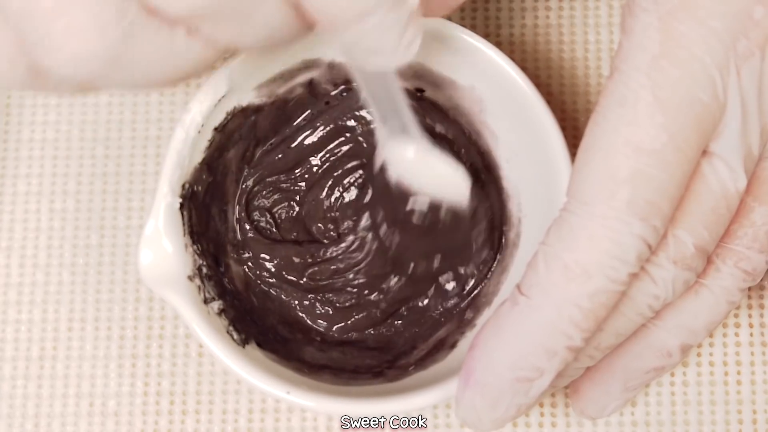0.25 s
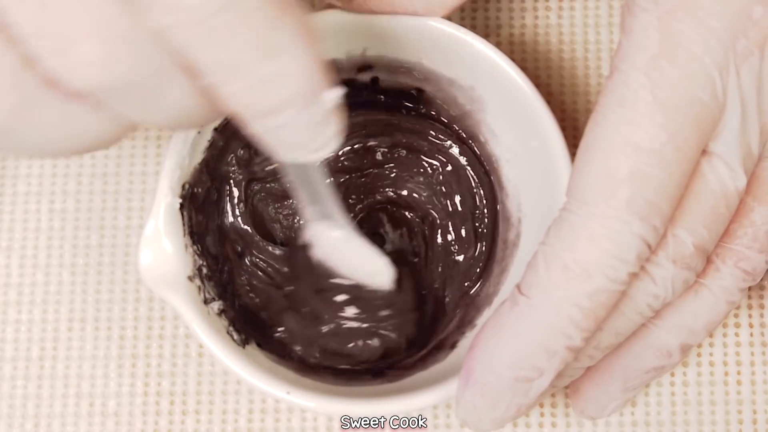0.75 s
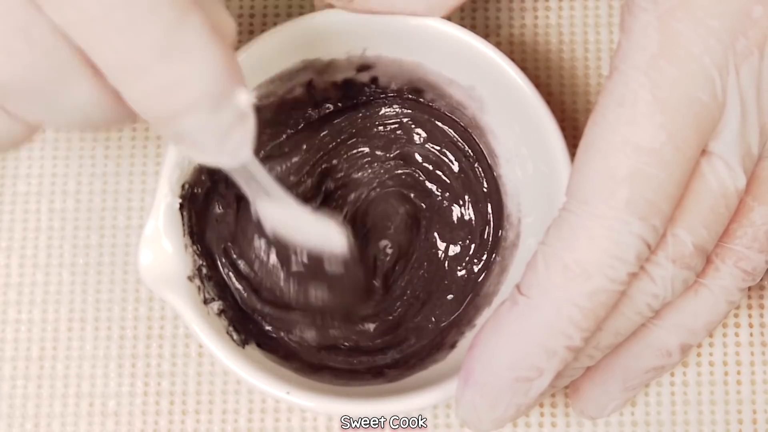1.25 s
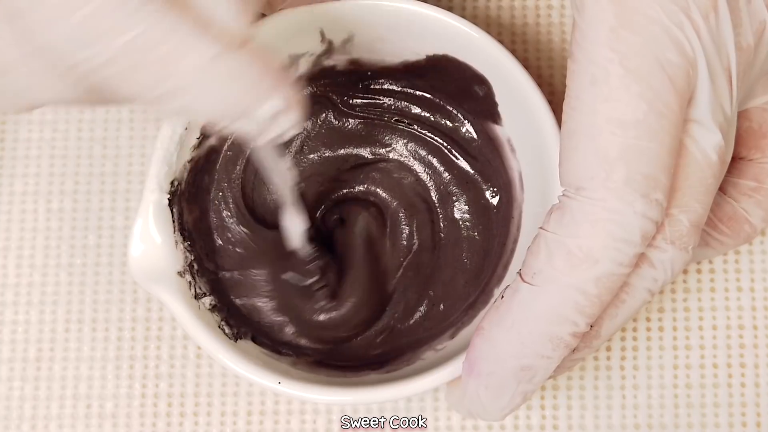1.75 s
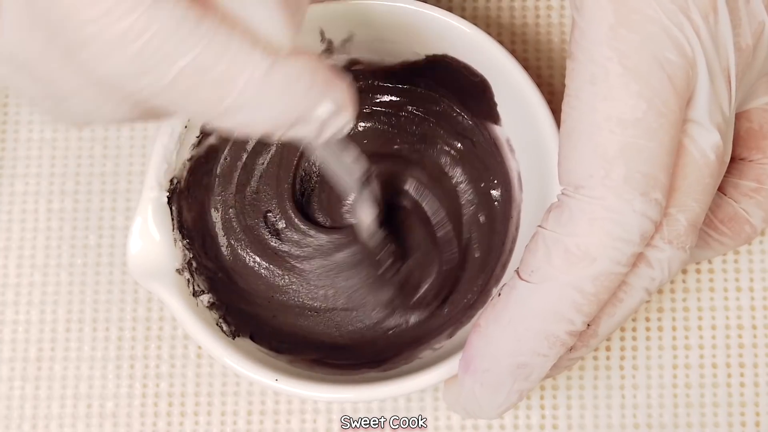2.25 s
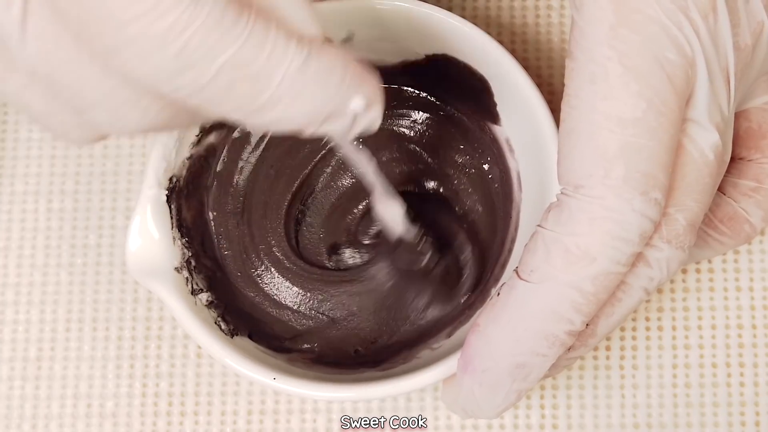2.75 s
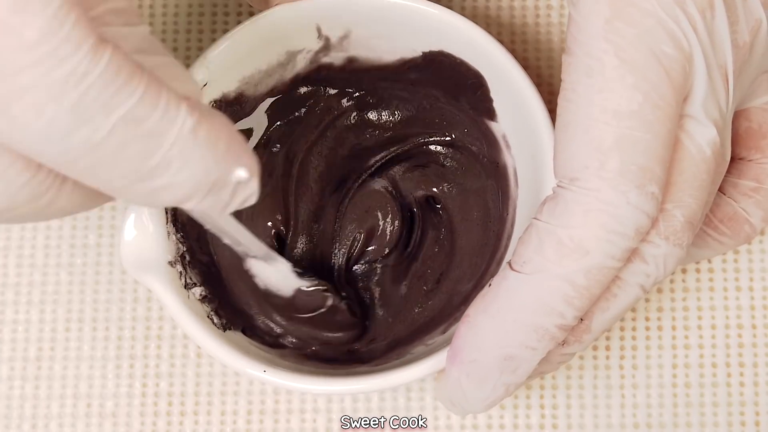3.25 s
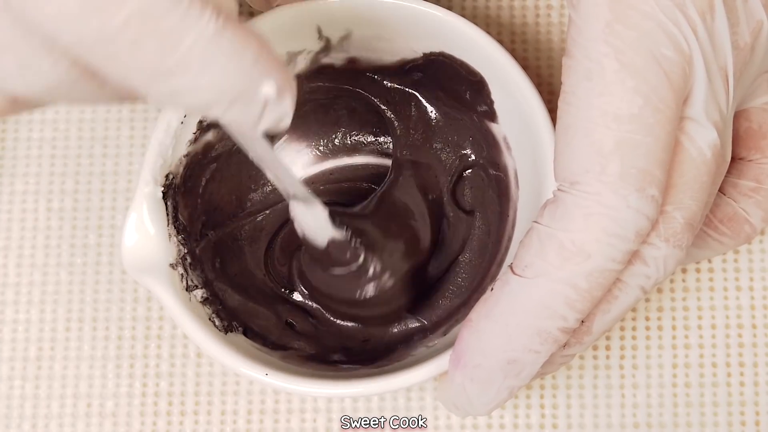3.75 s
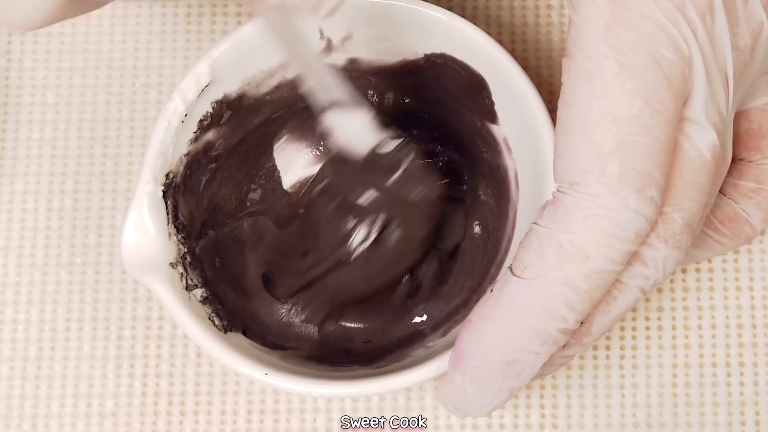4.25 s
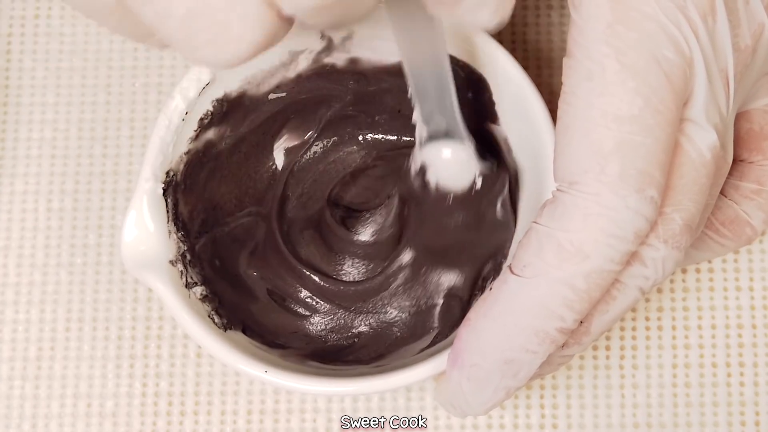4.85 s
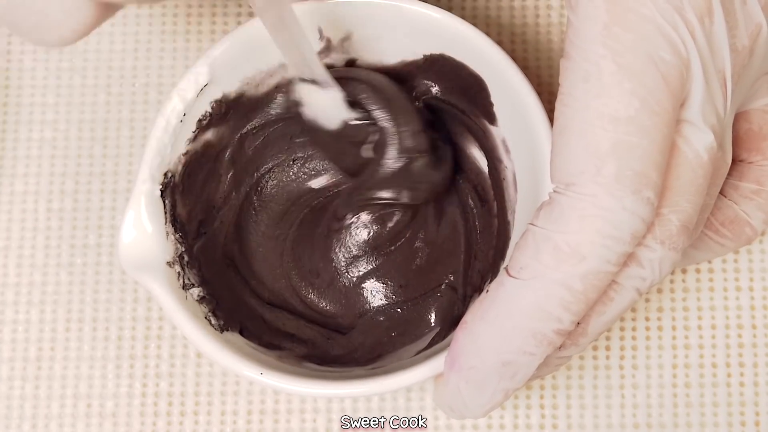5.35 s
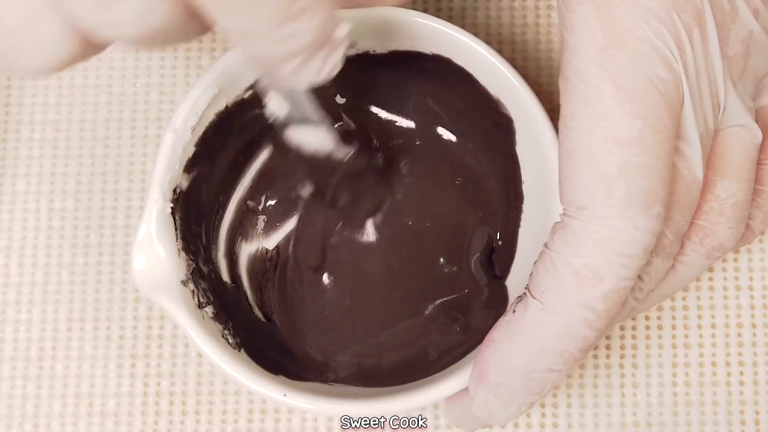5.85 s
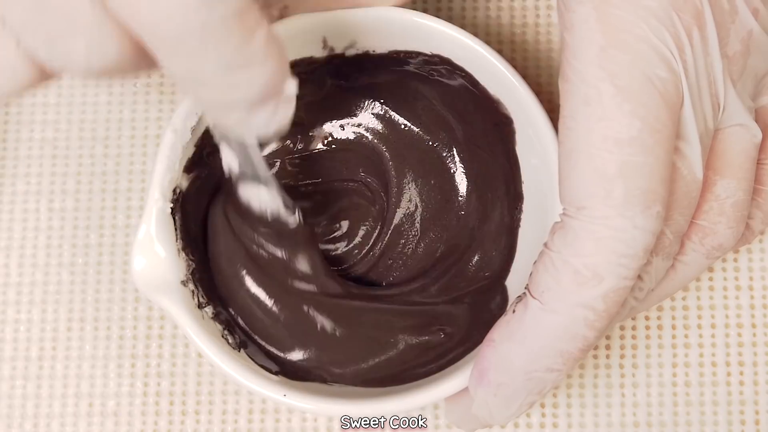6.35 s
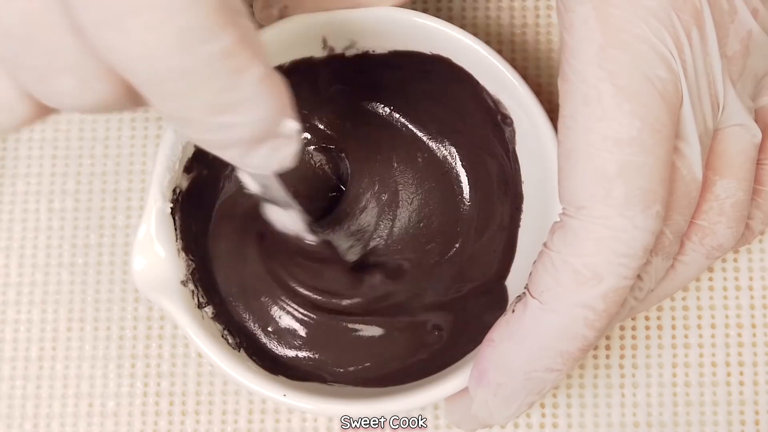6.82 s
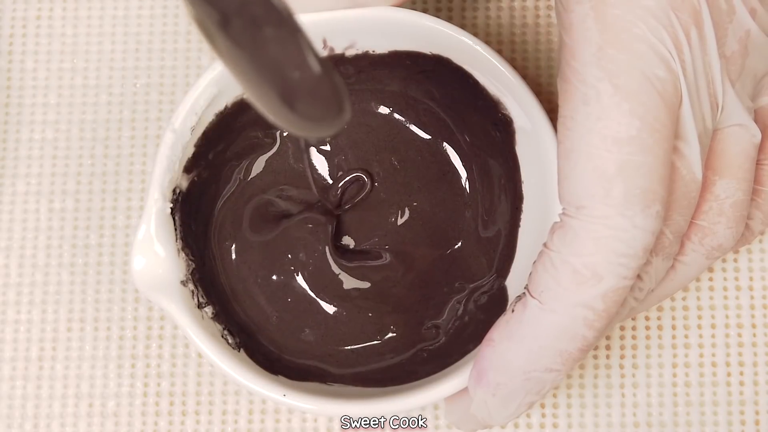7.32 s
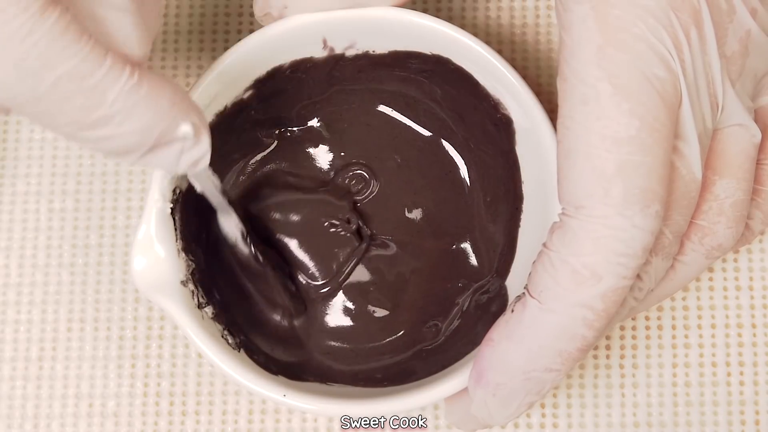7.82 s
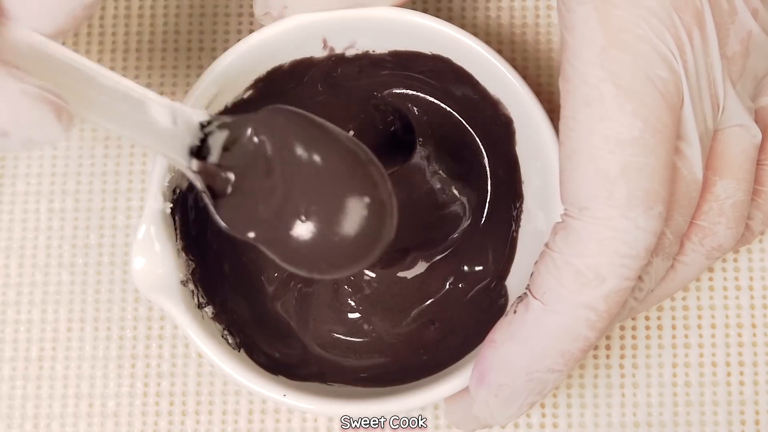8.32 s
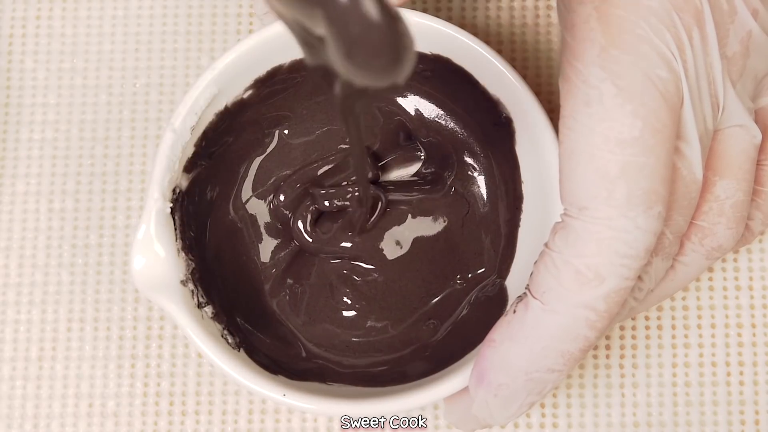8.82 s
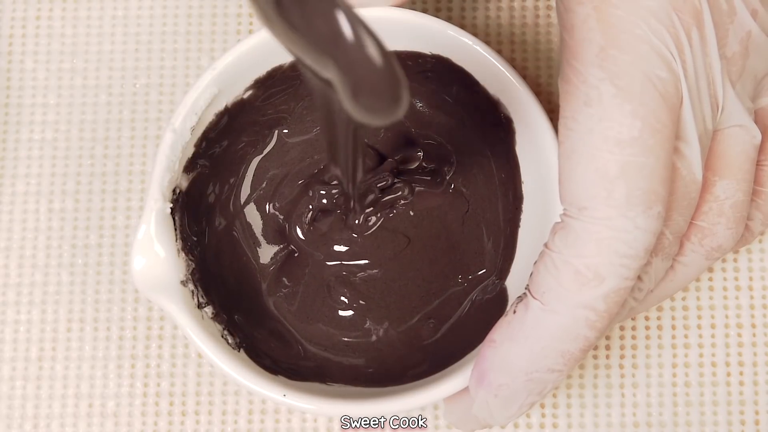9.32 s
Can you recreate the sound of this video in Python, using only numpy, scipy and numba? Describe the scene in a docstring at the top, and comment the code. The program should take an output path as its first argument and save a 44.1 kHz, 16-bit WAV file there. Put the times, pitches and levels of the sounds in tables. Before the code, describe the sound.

Sticky paste peels off a plastic blade and a small bowl in wet squelches, sucking noises and fine crackle. Air pockets pop open with short hollow plops and bright snaps, the strongest around the middle. Strokes grow longer and gooier, then stop, leaving faint room air and one brief late stir. Close stereo microphone, little room tail, low thuds shaking the table.

```python
"""In a quiet kitchen, a small plastic spatula stirs thick icing in a ceramic bowl close to a stereo microphone.
Turns open air pockets with a plop: a short swinging tone, a bright crackling part and a thump on the table.
The paste peels apart in streams of tiny damped tones, shaped by hollows and slits; later strokes are long and sticky.
The work shakes the table and the microphone stand: low ringing noise under soft handling and room noise."""
import sys
import numpy as np
from scipy import signal
from scipy.fft import rfft, irfft, next_fast_len
from scipy.io import wavfile
from scipy.ndimage import map_coordinates
from numba import njit

SR = 44100
rng = np.random.default_rng(int(sys.argv[2]) if len(sys.argv) > 2 else 0)


def generate_wav(sig):
    """Save sig (samples, or channels by samples) to the path in sys.argv[1] as 16-bit PCM at SR."""
    pcm = np.round(np.clip(np.atleast_2d(sig).T, -1, 1) * 32767).astype(np.int16)
    wavfile.write(sys.argv[1], SR, pcm)


N = 422467  # samples in the whole scene

# How the wet surface slides all along. Each row: time in seconds, relative level in dB.
SLIDE = [(0, -67.5), (1.5, -63), (2.5, -67), (3.9, -67.5), (4.8, -68.5), (5.9, -68.5), (7, -62.5),
         (7.3, -89), (8.3, -74.5), (9.55, -90)]
# Air resonances of a pocket. Each row: pitch in Hz and width in Hz (of one filter pass, both before
# the pitch ratio), level in dB.
POCKET = [(634, 317, 3), (852, 305, -2.5), (1930, 540, -11.5)]
# The same columns for the slit behind the blade.
SLIT = [(1997, 1040, -0.47), (3500, 890, 0.98), (7400, 2250, -2.5)]
# Tone colour of tearing films. Each row: frequency in Hz, relative level in dB.
TEAR = [(500, 5.5), (1000, -11), (1500, -19), (2700, 2.5), (4000, 0), (5200, -0.5), (7000, 1.5), (8800, -4),
        (12000, -5.5), (16000, -16)]


def peeling():
    """Paste parts from blade and bowl in quick fits: pockets squelch, air sucks through slits, films tear."""
    hollow, sucking, tearing, pocket_pitch, slit_pitch, fitful = stroke_gains()
    slide = amp(curve(SLIDE) + 3 * wobble(9))
    fits = unit(amp(fitful * (2.35 * wobble(70) + 2.83 * wobble(330))))

    pockets = grains(rate=3500, low_hz=324, high_hz=2550, cycles=1.0, spread_db=3.5, scatter_db=-5, size=300)
    squelch_gain = amp(-6.0) * hollow + amp(-13) * slide
    squelch = squelch_gain * cavity(pockets, POCKET, drift=0.05, pitch=pocket_pitch)

    bubbles = grains(rate=7000, low_hz=1270, high_hz=10100, cycles=0.74, spread_db=4.0, scatter_db=-2, size=128)
    suction_gain = amp(-2.5) * sucking + amp(-15.0) * slide
    suction = suction_gain * cavity(bubbles, SLIT, drift=0.06, pitch=slit_pitch)

    films = grains(rate=3300, low_hz=780, high_hz=16600, cycles=0.71, spread_db=1.0, scatter_db=13.5, size=128)
    tear = (amp(-0.5) * tearing + amp(-14) * slide) * unit(coloured(films, TEAR))

    # the finest films grow slightly faster than the tearing itself
    finest = grains(rate=1500, low_hz=8500, high_hz=15400, cycles=1.0, spread_db=2, scatter_db=14, size=32)
    fizz = amp(-3) * tearing * (tearing / amp(-42)) ** 0.17 * finest

    bright = (suction + tear + fizz) * amp([[1.3], [-1.3]])  # a little louder on the left
    return fits * (bright + squelch * amp([[0.4], [-0.4]]))


# Quick pulls, where the paste lets go at once. Each row: start in seconds, length in seconds,
# then relative levels in dB of pocket squelch, slit suction and tearing, and last the closing smack in dB
# compared with the start of the pull.
PULLS = [(0.112, 0.029, -55.5, -57.5, -74, -5), (0.527, 0.072, -56, -62, -84, -8),
         (0.758, .05, -54, -53, -80, -36), (1.371, 0.064, -52.5, -65, -77, -8.5),
         (1.513, 0.016, -52, -61, -64, -3.5), (1.742, 0.035, -47, -56, -63, -25),
         (1.953, 0.091, -47, -56.5, -58, -24), (2.194, .09, -46.5, -56, -63.5, -3),
         (2.446, 0.061, -45.5, -57, -67, -7.5), (2.706, 0.045, -47, -57, -63, -4.5),
         (2.959, 0.05, -46, -51.5, -61, -24), (3.189, 0.031, -52, -50.5, -61, -0.5),
         (3.556, 0.032, -55, -74, -59.5, -24), (3.776, 0.048, -56, -69, -62, -5),
         (4.09, 0.056, -49, -56.5, -75, -27), (4.313, 0.056, -62, -63.5, -75, 0),
         (4.509, 0.073, -49, -55.5, -84, -17), (4.706, 0.065, -50.5, -53.5, -61, -6.5),
         (4.998, 0.026, -65, -60.5, -67, -4), (5.394, 0.0093, -50, -67, -64, -17),
         (5.746, 0.043, -58, -51, -53, -1), (6.138, 0.042, -58, -52, -57, -11),
         (8, 0.065, -51, -73, -60, -5)]
# Pitch ratios in a quick pull: first the pocket, then the slit.
PULL_PITCH = (1.24, 0.895)
# Slow drags that swell and fade. Each row: start, rise and fall in seconds, relative levels in dB of
# squelch, suction and tearing, then the pitch ratios of pocket and slit.
DRAGS = [(0.01, 0.073, 0.0061, -54, -59, -59.5, 1.33, 0.8),
         (0.219, 0.017, 0.019, -43.5, -62, -69, 1.05, 0.82),
         (0.27, 0.022, .055, -59.5, -68.5, -81, 1.14, 0.97),
         (0.885, 0.023, 0.022, -52.5, -74, -76, 1.04, 0.96),
         (0.995, 0.056, 0.019, -50, -62.5, -77, 1.21, 0.88), (1.155, .04, 0.049, -60, -70, -69, 1.13, 0.95),
         (2.755, .01, 0.038, -60, -66, -65, 1.17, 0.87), (3.225, 0.009, 0.022, -49, -54, -58, 1.34, 1.01),
         (3.61, 0.13, .01, -50, -75, -61, 0.97, 1.14), (3.723, 0.025, 0.018, -38, -49, -54, 1, 1.41),
         (5.034, .036, 0.084, -60, -48.5, -55, 1.03, 1.026),
         (5.41, 0.13, 0.022, -49, -54.5, -55.5, 1.11, 1.05),
         (5.804, 0.027, 0.059, -47, -44, -47, 1.17, 1.01), (6.17, 0.047, 0.036, -48, -59, -62, 0.88, 0.87),
         (6.259, 0.051, .08, -47, -50.5, -51.5, 1.2, 1.08),
         (6.439, 0.062, 0.035, -49.5, -59, -63.5, 1.19, 0.94),
         (6.538, 0.014, 0.07, -53, -57.5, -58.5, 0.98, 1.04),
         (6.59, 0.016, 0.032, -53, -73, -56, 1.7, 0.83), (6.629, 0.015, 0.061, -55.5, -58, -59, 1.17, 1.05),
         (6.705, 0.016, 0.063, -49, -57, -60, 1.23, 0.67), (6.84, 0.072, 0.034, -56, -59, -59, 1.14, 1.04),
         (6.96, 0.022, 0.038, -50.5, -61.5, -63, 1.15, 0.72),
         (7.819, 0.053, 0.011, -72, -78, -62.5, 1.1, 1.4), (8.015, 0.063, 0.2, -51.5, -66, -61.5, 1, 1.58),
         (8.155, 0.026, 0.033, -45, -54, -58, 0.97, 1.6), (8.234, 0.0092, .012, -57, -65, -73, 1.26, 1.3)]
SAG_DB, SMACK_S = 19, 0.0068  # weakening of a pull over its length; half width of its closing smack
SWELL_DB, FADE_DB = 10, 7  # a drag starts and ends this far below its crest
EDGE_S, RELEASE_S = 0.0041, 0.013  # time to take hold of the paste and to let go
FITFUL_S, FITFUL_MAX = 0.063, 1.57  # shorter strokes stick and slip more, longer ones less; upper limit


def stroke_gains():
    """Each stroke sets squelch, suction and tearing strength, two pitch ratios, and how fitfully paste parts."""
    t = np.arange(SR // 3) / SR - EDGE_S
    strokes = []
    for s, length, *levels, smack_db in PULLS:
        smack = amp(smack_db) * np.exp(-0.5 * ((t - length) / SMACK_S) ** 2)
        shape = gate(t, length) * amp(-SAG_DB * t / length) + smack
        strokes.append((s, length, shape, levels, PULL_PITCH))
    for s, rise, fall, *levels, pocket, slit in DRAGS:
        length = rise + fall
        swell_db = np.interp(t, [0, rise, length], [-SWELL_DB, 0, -FADE_DB])
        strokes.append((s, length, gate(t, length) * amp(swell_db), levels, (pocket, slit)))

    # overlapping strokes add in power; pitch and fitfulness are averaged by strength
    power, weight, blend = np.zeros((3, N)), np.full(N, 1e-4), np.zeros((3, N))
    for s, length, shape, levels, pitches in strokes:
        fitful = min(FITFUL_S / length, FITFUL_MAX)
        add(power, s - EDGE_S, (amp(levels)[:, None] * shape) ** 2)
        add(weight, s - EDGE_S, shape)
        add(blend, s - EDGE_S, np.log([*pitches, fitful])[:, None] * shape)
    return *np.sqrt(power), *np.exp(blend / weight)


def gate(t, length):
    """The blade takes hold just before t = 0 and lets go after length seconds."""
    return np.clip(1 + t / EDGE_S, 0, 1) * np.clip(1 - (t - length) / RELEASE_S, 0, 1)


def cavity(x, modes, drift, pitch=1):
    """Sound through a hollow in the paste; its resonances move together as it changes size; rms 1."""
    ratio = pitch * np.exp(drift * wobble(13))
    out = np.zeros_like(x)
    for hz, width, db in modes:
        step = np.tan(np.pi * np.minimum(hz * ratio, SR / 3) / SR)
        once = glide_filter(x, step, width / hz)
        out += amp(db) * glide_filter(once, step, width / hz)
    return unit(out)


@njit
def glide_filter(x, step, damping):
    """A resonance whose centre moves; step is tan(pi f / SR) for each sample."""
    y = np.zeros_like(x)
    for c in range(2):
        s1 = s2 = 0.0
        for i in range(x.shape[1]):
            g = step[i]
            band = (s1 + g * (x[c, i] - s2)) / (1 + g * (g + damping))
            s1 = 2 * band - s1
            s2 += 2 * g * band
            y[c, i] = band * damping
    return y


# Air pockets opening. Each row: start in seconds, relative level in dB, pitch in Hz, cycles to full swing
# (at least 0.05), bright part (film crack or pocket overtone) in relative dB, its pitch in Hz,
# table thump in relative dB.
PLOPS = [(0.0833, -40.5, 1000, 0.36, -43, 6700, -77), (0.5282, -33, 670, 0.19, -37, 6060, -82),
         (0.7042, -38.5, 850, .35, -39, 3900, -77), (0.7585, -44, 815, 0.73, -38, 2200, -81),
         (0.7705, -38, 860, .2, -42, 2200, -82), (0.997, -46, 800, .35, -56, 2500, -89),
         (1.197, -46, 830, .35, -45, 2200, -85), (1.3705, -42.5, 800, 0.27, -39, 2120, -67),
         (1.524, -38.5, 850, 0.44, -37, 2200, -70), (1.7395, -34.5, 710, .35, -28, 2380, -62),
         (1.9502, -37.5, 705, .33, -31.5, 2830, -60), (2.192, -37, 650, 0.44, -31.5, 2860, -65),
         (2.437, -35.5, 520, 0.13, -35.5, 2670, -61.5), (2.7055, -28, 810, 0.71, -24, 3280, -61),
         (2.959, -29.5, 790, 0.23, -24, 2200, -69), (3.015, -43, 850, .35, -54, 2500, -80),
         (3.1868, -29, 950, 0.18, -20.5, 2130, -63), (4.0888, -19, 594, 0.23, -31.5, 3440, -52.5),
         (4.3121, -24, 586, 0.27, -29, 3000, -55), (4.514, -22, 670, .12, -25.5, 5140, -54.5),
         (5.001, -46.5, 620, .35, -33, 3100, -71), (5.5309, -32, 694, 0.37, -58, 5920, -71),
         (6.135, -36.5, 670, 0.44, -30, 3820, -58.5), (8.0019, -42.5, 660, 0.71, -37.5, 3470, -71)]


def plops():
    """The cavity swings under a bright film crack or overtone, the film rips on, and the bowl thumps the table."""
    out, t = np.zeros((2, N)), np.arange(SR // 6) / SR
    thumps = np.zeros(N)
    for s, db, hz, swell, bright_db, bright_hz, thump_db in PLOPS:
        u = t * hz / max(swell, 0.05)  # reaches 1 at full swing
        add(out, s, amp(db) * np.sin(2 * np.pi * hz * t) * u * np.exp(1 - u))
        add(out, s, amp(bright_db - 5) * snap(bright_hz, cycles=1.6, spray_db=-12.5, spray_life=0.0009))
        # the rim of the hole gives way in a few weaker steps
        for late in np.cumsum(rng.uniform(0.0005, 0.0015, size=3)):
            rip_hz = bright_hz * np.exp(rng.normal(0, 0.087))
            rip = snap(rip_hz, cycles=0.66, spray_db=-19.5, spray_life=0.00034)
            add(out, s + late, amp(bright_db - 7.5) * rip)
        add(thumps, s, amp(thump_db + 15) * np.exp(-t / 0.023) * (1 - np.exp(-t / 0.001)))
    table = noise([(25, -15.5), (55, 6.5), (150, -2), (260, -7), (500, -30), (1500, -51)], side_db=-3.5)
    return out * amp([[0.4], [-0.4]]) + thumps * table


# Larger bubbles, threads and the sharp top of some plops. Each row: start in seconds, relative level in dB,
# pitch in Hz.
SNAPS = [(0.1423, -38.5, 3350), (0.902, -38.5, 7920), (0.9122, -43, 8900), (1.828, -40.5, 11900),
         (1.857, -38.5, 9430), (2.5962, -41.5, 5670), (2.8058, -37.5, 3940), (2.9579, -28.5, 6500),
         (3.186, -30, 5650), (3.2836, -30.5, 10000), (3.5556, -33.5, 7600), (3.728, -12.5, 8100),
         (4.1077, -35.5, 8040), (4.2932, -41, 6270), (4.7115, -27.5, 5400), (5.001, -34.5, 7050),
         (5.0697, -31, 3480), (5.2843, -34, 3420), (5.391, -37, 3350), (5.6583, -33, 7340),
         (5.748, -33, 4930), (5.7894, -21, 7400), (5.8069, -27.5, 3750), (5.866, -41, 7500),
         (6.404, -32.5, 3870), (6.6571, -30, 9710), (6.9708, -33, 8390), (7.8228, -48.5, 2330),
         (7.8714, -35.5, 6900), (8.7522, -41, 6500), (9.009, -41.5, 11300)]


def snaps():
    """Larger bubbles, threads and the sharp top of some plops snap, each with a short ring and spray."""
    out = np.zeros((2, N))
    for s, db, hz in SNAPS:
        add(out, s, amp(db + 3.0) * snap(hz, cycles=0.99, spray_db=-16.5, spray_life=0.0013))
    return out * amp([[1.2], [-1.2]])


def snap(hz, cycles, spray_db, spray_life):
    """A sharp snap: a fast-dying tone at its pitch and a brief spray of noise."""
    t = np.arange(SR // 80) / SR
    ring = np.sin(2 * np.pi * hz * t) * np.exp(-t * hz / cycles) * (1 - np.exp(-2 * t * hz))
    band = signal.butter(2, [2200, 15000], "band", fs=SR, output="sos")
    spray = signal.sosfilt(band, rng.standard_normal((2, len(t))))
    return ring + amp(spray_db) * spray * np.exp(-t / spray_life)


def prickle():
    """Stray pinhead bubbles burst on the stirred surface, louder when it slides more."""
    ticks = grains(rate=22, low_hz=6140, high_hz=14000, cycles=1.0, spread_db=5.5, scatter_db=2, size=64)
    return amp(curve(SLIDE) - 13.0) * ticks


# A thin squeak of the blade. Each row: time in seconds, centre pitch in Hz, relative level in dB.
SQUEAK = [(3.3, 4440, -79), (3.4, 4390, -72), (3.54, 4370, -68), (3.57, 4400, -86)]


def squeak():
    """The blade slides over a bare patch of glaze: a faint whistle of unsteady pitch and level."""
    s, hz, db = np.transpose(SQUEAK)
    t = np.arange(N) / SR
    pitch = np.interp(t, s, hz) + 30 * wobble(200)
    grip = amp(np.interp(t, s, db) - 10 + 2.5 * wobble(60)) * (t > s[0]) * (t < s[-1])
    return grip * np.sin(2 * np.pi * np.cumsum(pitch) / SR)


# Ringing of the icing-damped bowl and the air in it. Each row: pitch in Hz, width in Hz, relative level in dB.
BOWL = [(613, 91, -9), (1731, 31, 9.5), (1900, 120, 7.5), (2300, 230, 8), (2700, 19, -21), (2900, 19, -22),
        (3340, 53, -4), (3890, 23, 10.5), (4240, 41, 2), (4760, 12, -16), (4930, 13, -28), (5300, 25, -22),
        (7300, 270, -2), (9100, 50, -32)]


def bowl(icing):
    """The sound of the icing makes the bowl and the air in it ring."""
    return amp(-11) * filtered(icing, lambda hz: ringing(BOWL, hz))


# Fading of the room tail. Each row: frequency in Hz, time in seconds to fall by 60 dB.
KITCHEN = [(200, 0.5), (1000, 0.36), (4000, 0.43), (14000, 0.12)]


def kitchen(x):
    """The table and near walls answer in a quick burst, together with a faint short tail."""
    hz, t, z = signal.stft(rng.standard_normal((2, SR // 3)), SR, nperseg=256)
    fading = amp(-60 * t / along(KITCHEN, hz)[:, None])
    tail = signal.istft(z * fading, SR, nperseg=256)[1]
    age = np.arange(tail.shape[1]) / SR
    early = rng.standard_normal(tail.shape) * np.exp(-age / 0.0055) * (age > 0.0015)
    answer = amp(-16.5) * tail / np.linalg.norm(tail[0]) + amp(-29.5) * early / np.linalg.norm(early[0])
    return signal.oaconvolve(x, answer, axes=1)[:, :N]


# Slow swaying of the microphone stand. Each row: pitch in Hz, width in Hz, relative level in dB.
STAND = [(20.16, 3.4, 3.5), (24.66, 1.44, 1), (29.2, 1.9, -14), (36.1, 2.5, -17.5), (59, 2.7, -42)]


def stand():
    """The stand sways in its low modes, pushing the two capsules oppositely, and bobs them together."""
    # modes well above 65 Hz are held back
    sway, bob = filtered(rng.standard_normal((2, N)), lambda hz: ringing(STAND, hz) / (1 + (hz / 65) ** 4))
    opposite = np.array([[0.9], [-1.1]])
    return sway_gain() * (amp(3.5) * unit(sway) * opposite + amp(-5.0) * unit(bob))


# How hard the arm shakes the stand. Each row: time in seconds, relative level in dB.
SHAKE = [(0, -54), (1.2, -58.5), (2.13, -44.5), (3.28, -47), (3.95, -63), (4.62, -39.5), (5.2, -51.5),
         (6.3, -48.5), (7.76, -51), (9.58, -62.5)]
KICK_DB, KICK_S = 12.5, 0.23  # added to the thump level; seconds for a kick to fade to about a third


def sway_gain():
    """The arm keeps the stand moving; every thump kicks it further and dies away."""
    gain, t = amp(curve(SHAKE)), np.arange(SR) / SR
    for s, *_, thump_db in PLOPS:
        add(gain, s, amp(thump_db + KICK_DB) * np.exp(-t / KICK_S) * (1 - np.exp(-t / 0.026)))
    return gain


# Dull handling of the bowl on its mat. Each row: time in seconds, relative level in dB.
HANDLING = [(0, -65), (1.4, -64), (2.7, -66.5), (3.7, -66), (4.15, -61.5), (4.7, -66.5), (6.8, -65),
            (7.5, -68.5), (8.96, -63.5), (9.58, -68.5)]
# Tone colour of the mat. Each row: frequency in Hz, relative level in dB.
MAT = [(30, 3), (60, 1), (120, 1), (180, -2), (290, -2), (400, -8.5), (600, -17), (1200, -22.5),
       (3000, -32)]


def handling():
    """The bowl moves on its mat: dull noise whose level wanders."""
    return amp(curve(HANDLING) + 3.5 + 0.57 * wobble(6.7)) * noise(MAT, side_db=-5.0)


# Tone colour of the quiet room. Each row: frequency in Hz, relative level in dB.
AIR = [(40, 27), (250, 5), (500, 10), (1000, 2.5), (2000, 2.5), (4000, -4.5), (8000, -4.5), (16000, -4.5)]


def room_air():
    """Steady, faint wide noise of the quiet room."""
    return amp(-67.5) * noise(AIR, side_db=0.0)


def grains(rate, low_hz, high_hz, cycles, spread_db, scatter_db, size):
    """A stream of tiny bursting bubbles, each a damped sine of its own pitch, level and place; rms 1."""
    when, pitch, strength, place = rng.random((int(rate * N / SR), 4)).T
    hz = (low_hz * (high_hz / low_hz) ** pitch)[:, None]
    phase = hz * np.arange(size) / SR  # in cycles
    gain = amp(spread_db * np.minimum(-np.log(1 - strength), 4))[:, None]  # a few are much stronger
    waves = gain * hz * np.sin(2 * np.pi * phase) * np.exp(-phase / cycles)  # small bubbles: brief but sharp
    index = (when * N).astype(int)[:, None] + np.arange(size)
    pan_db = scatter_db * (place[:, None] - 0.5)
    sides = []
    for way in (1, -1):
        panned = waves * amp(way * pan_db)
        sides.append(np.bincount(index.ravel(), panned.ravel(), N)[:N])
    return unit(np.array(sides))


def noise(spectrum, side_db):
    """Stereo noise of rms 1; side_db sets its width."""
    mid, side = filtered(rng.standard_normal((2, N)), lambda hz: amp(along(spectrum, hz)))
    return unit(np.array([mid + amp(side_db) * side, mid - amp(side_db) * side]))


def ringing(modes, hz):
    """Combined response of resonances given as (Hz, width in Hz, dB)."""
    return sum(amp(db) * 1j * hz * w / (c * c - hz * hz + 1j * hz * w) for c, w, db in modes)


def filtered(x, response):
    """x times a response of frequency."""
    m = next_fast_len(N + SR // 2, real=True)
    return irfft(rfft(x, m) * response(np.fft.rfftfreq(m, 1 / SR)), m)[..., :N]


def coloured(x, spectrum, size=2048):
    """Filter with the given spectrum that never acts early, so that clicks keep their sharp front."""
    cepstrum = irfft(np.log(amp(along(spectrum, np.fft.rfftfreq(size, 1 / SR)))))
    cepstrum[1:size // 2] *= 2  # folding all onto the later side gives minimum phase
    cepstrum[size // 2 + 1:] = 0
    impulse = irfft(np.exp(rfft(cepstrum)))
    return signal.oaconvolve(x, impulse[None], axes=1)[:, :N]


def amp(db):
    """Decibels to gain."""
    return 10 ** (np.asarray(db) / 20)


def unit(x):
    """Scale to rms 1."""
    return x / np.sqrt(np.mean(x ** 2) + 1e-20)


def along(points, hz):
    """Read (Hz, value) points on a log axis."""
    f, v = np.transpose(points)
    return np.interp(np.log(hz + 1), np.log(f + 1), v)


def curve(rows):
    """One value per sample from (seconds, value) rows."""
    return np.interp(np.arange(N) / SR, *np.transpose(rows))


def wobble(rate):
    """A smooth random curve with rate knots a second."""
    knots = rng.standard_normal(int(N * rate / SR) + 4)
    return map_coordinates(knots, [np.arange(N) * rate / SR])


def add(track, s, sound):
    """Mix a sound into the track at time s in seconds."""
    i = max(0, round(s * SR))
    track[..., i:i + sound.shape[-1]] += sound[..., :max(0, N - i)]


def scene():
    """The icing, mostly a little louder on the left, rings the bowl over stand, handling and room noise."""
    icing = peeling() + plops() + snaps() + prickle() + squeak()
    icing = icing + bowl(icing)
    return icing + kitchen(icing) + stand() + handling() + room_air()


def record(dry):
    """Sound reaches the left capsule 30 microseconds after the right; nothing is kept above 16.1 kHz."""
    lag = np.array([[0.000015], [-0.000015]])  # seconds
    return filtered(dry, lambda hz: np.exp(-2j * np.pi * hz * lag) * (hz < 16100))


dry = scene()
out = record(dry)
generate_wav(out)
```